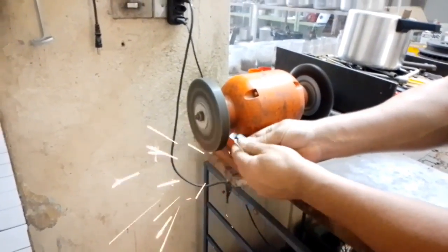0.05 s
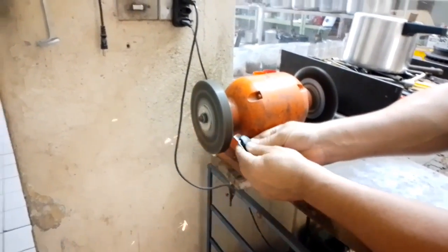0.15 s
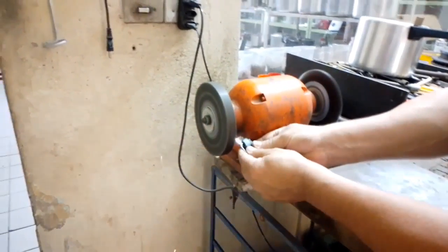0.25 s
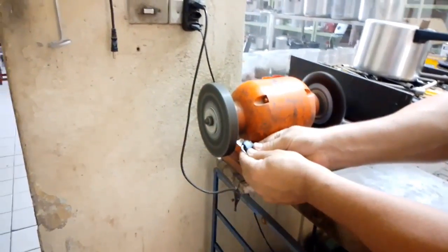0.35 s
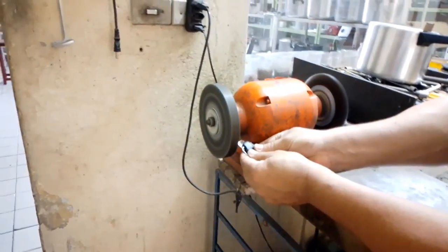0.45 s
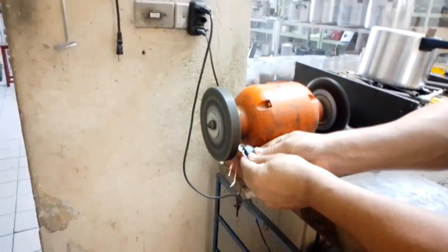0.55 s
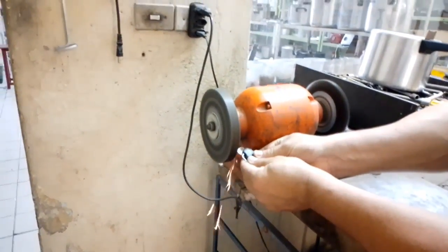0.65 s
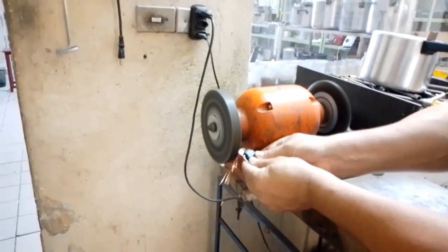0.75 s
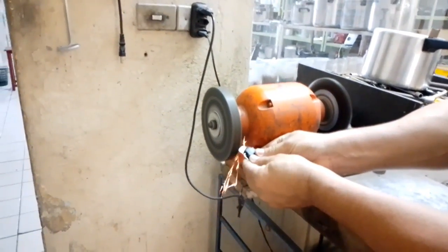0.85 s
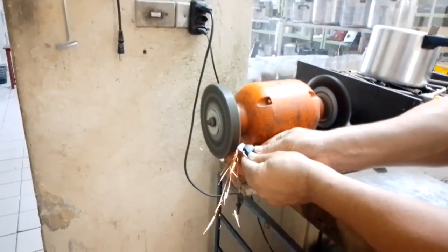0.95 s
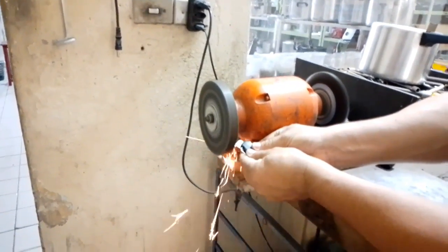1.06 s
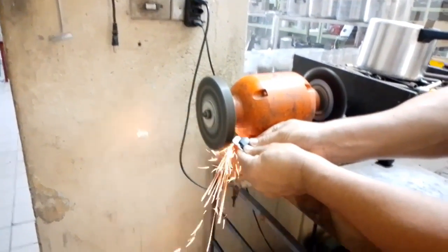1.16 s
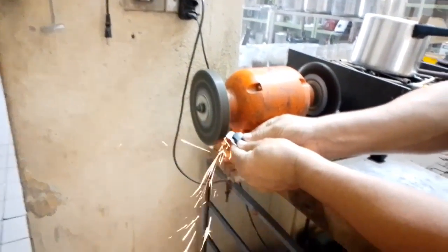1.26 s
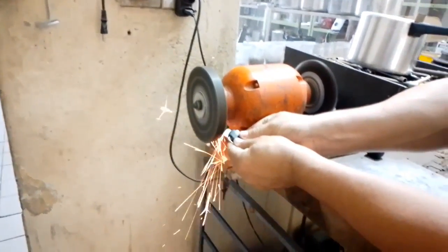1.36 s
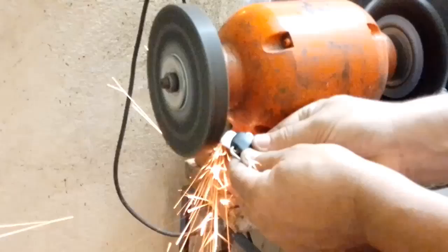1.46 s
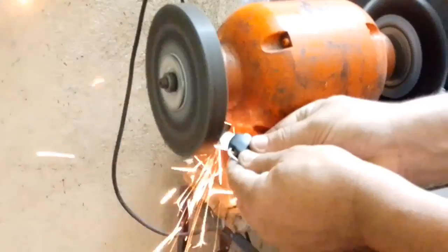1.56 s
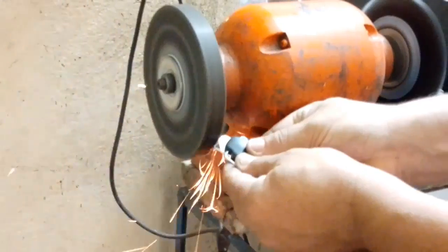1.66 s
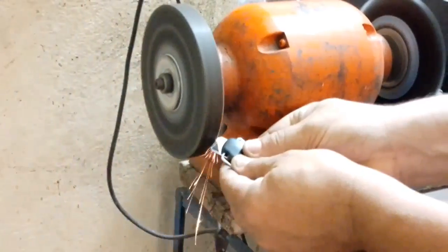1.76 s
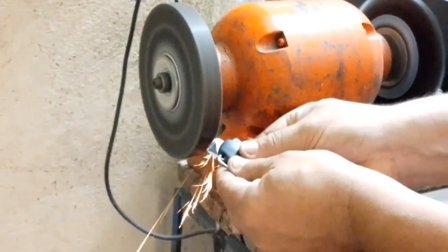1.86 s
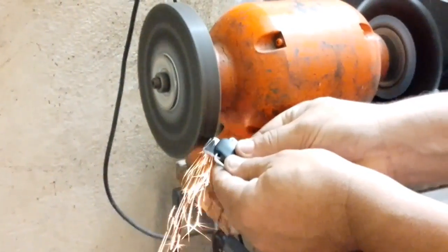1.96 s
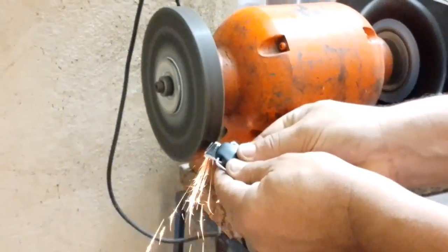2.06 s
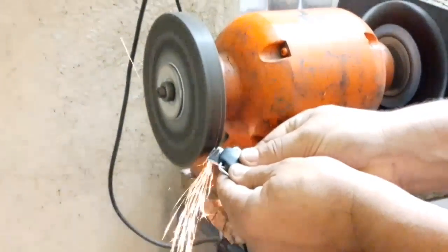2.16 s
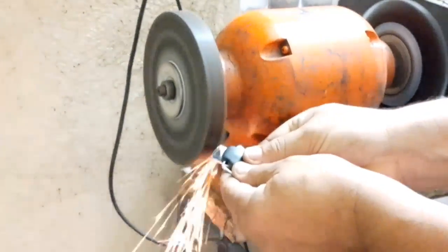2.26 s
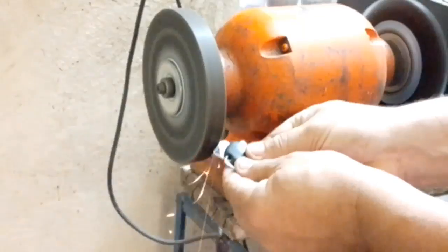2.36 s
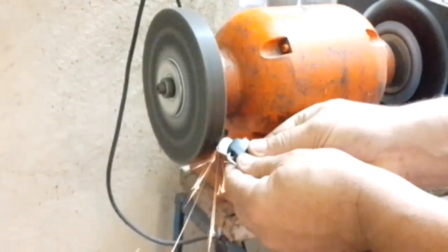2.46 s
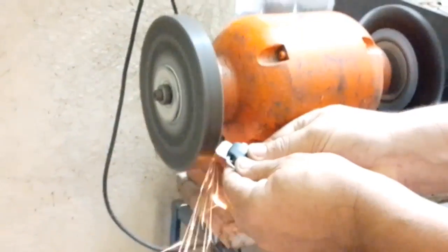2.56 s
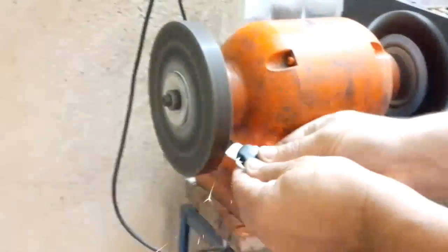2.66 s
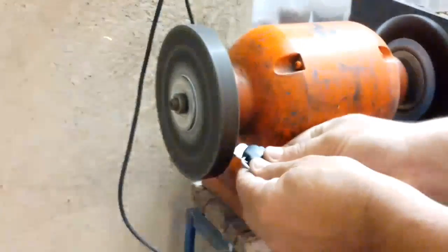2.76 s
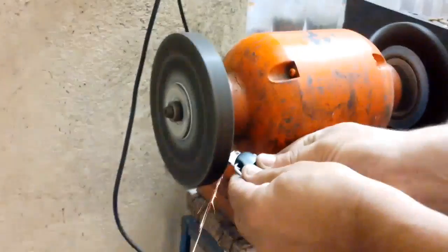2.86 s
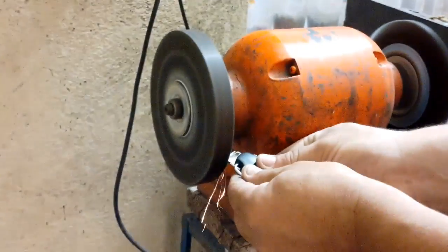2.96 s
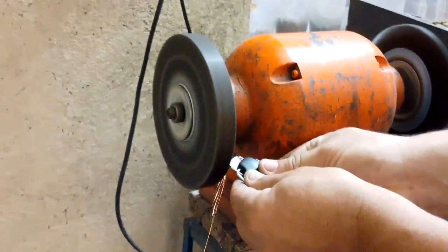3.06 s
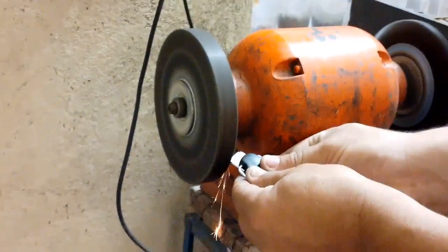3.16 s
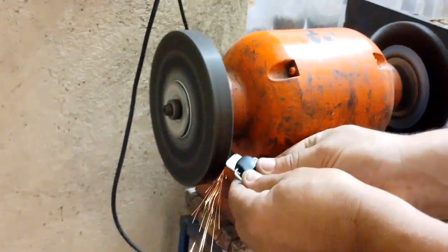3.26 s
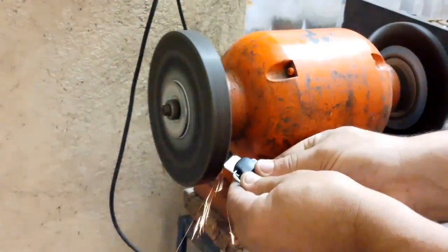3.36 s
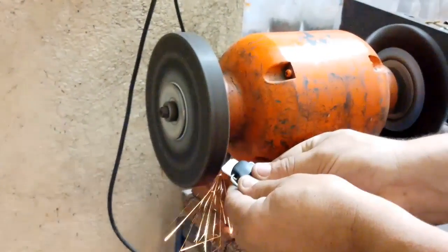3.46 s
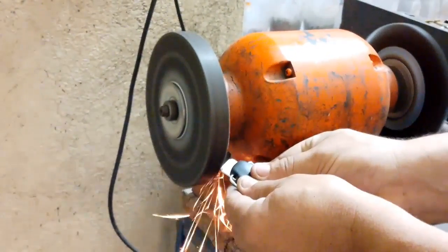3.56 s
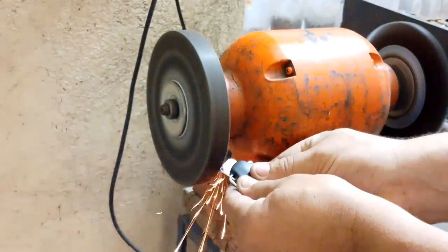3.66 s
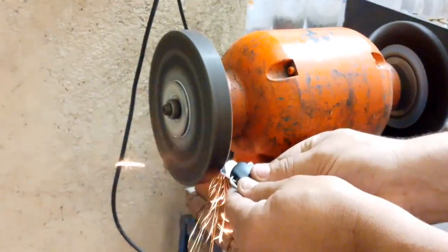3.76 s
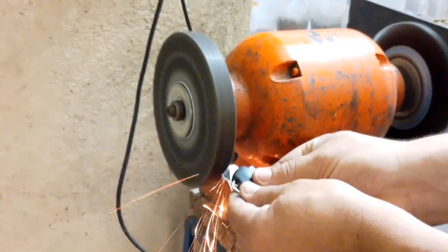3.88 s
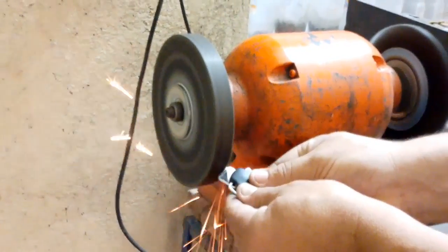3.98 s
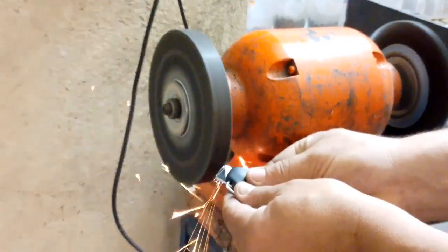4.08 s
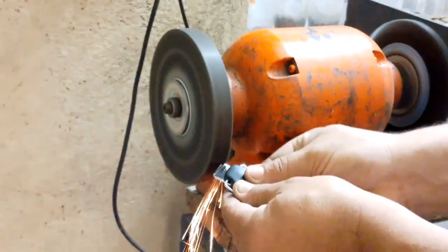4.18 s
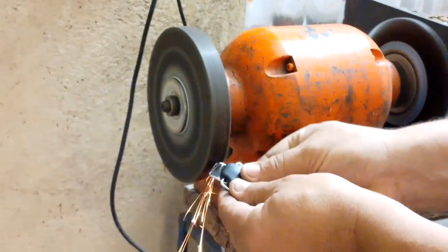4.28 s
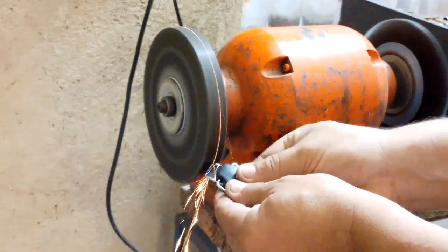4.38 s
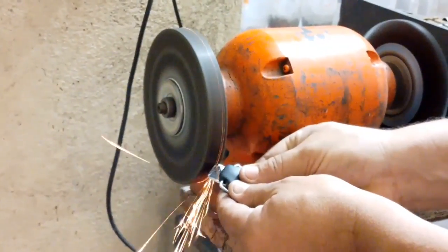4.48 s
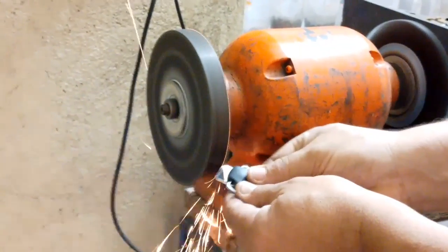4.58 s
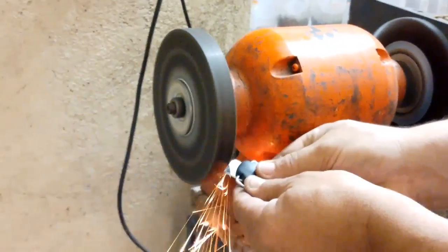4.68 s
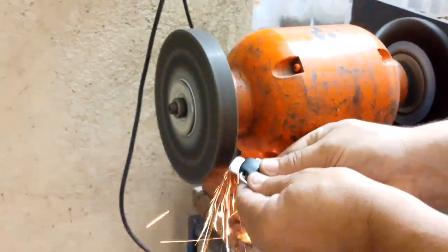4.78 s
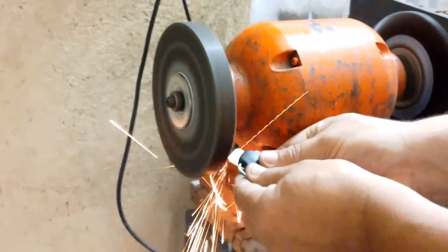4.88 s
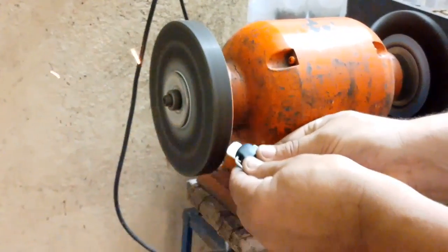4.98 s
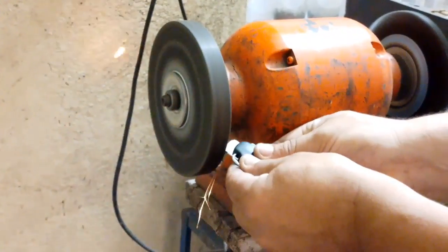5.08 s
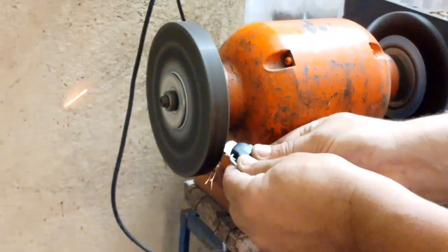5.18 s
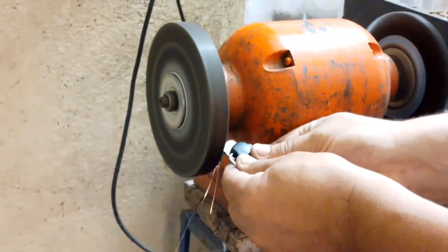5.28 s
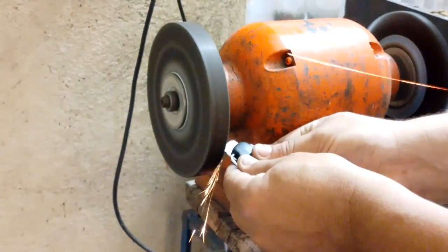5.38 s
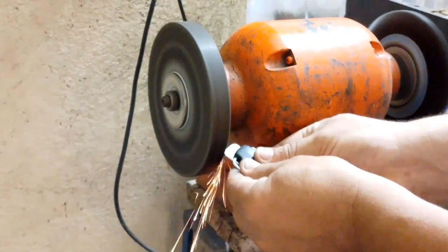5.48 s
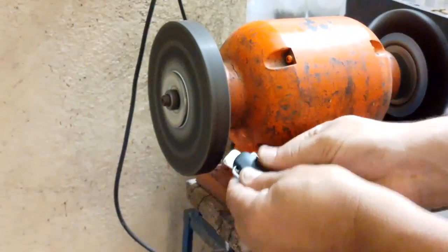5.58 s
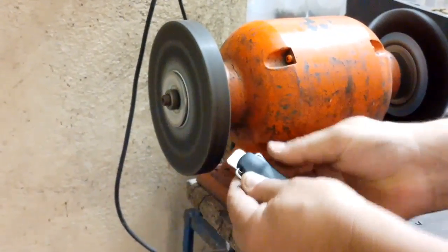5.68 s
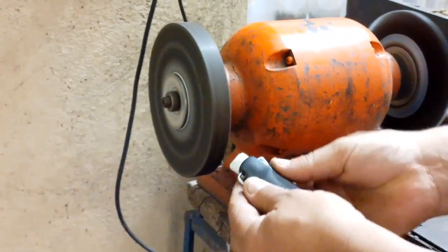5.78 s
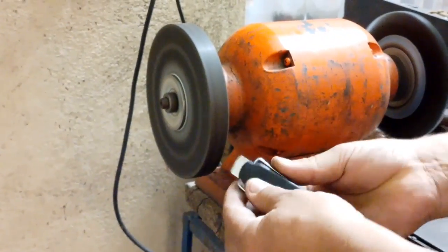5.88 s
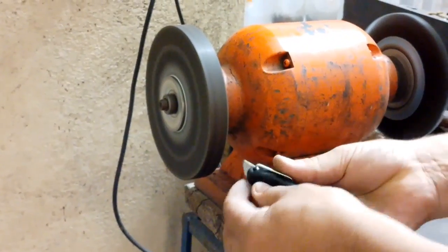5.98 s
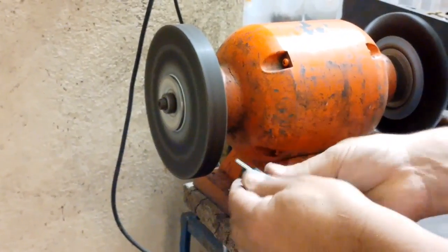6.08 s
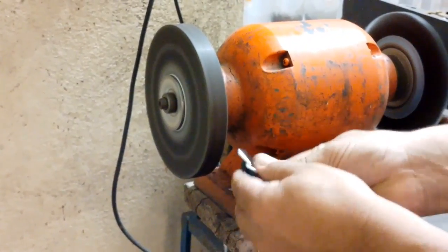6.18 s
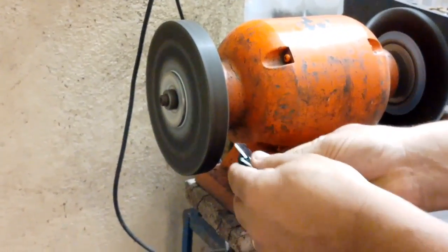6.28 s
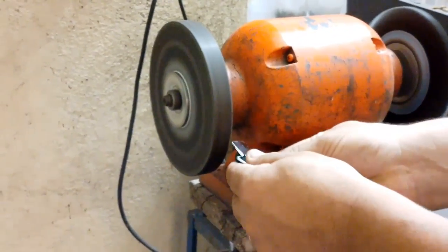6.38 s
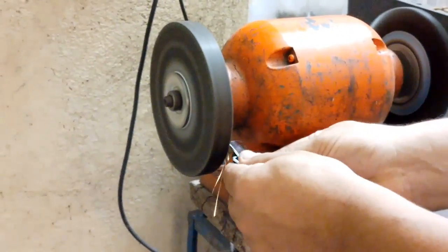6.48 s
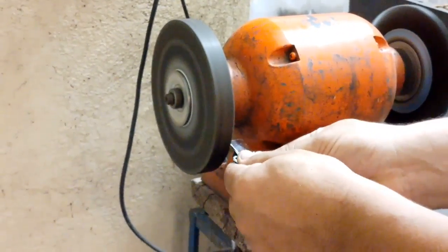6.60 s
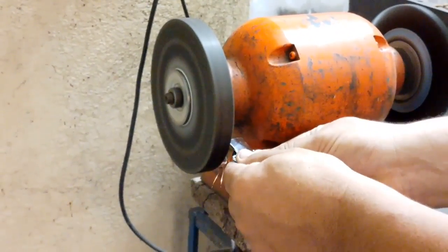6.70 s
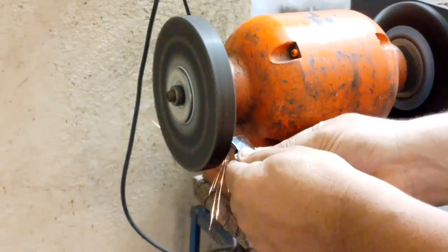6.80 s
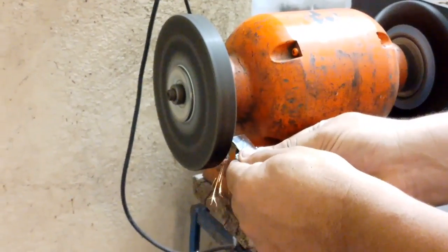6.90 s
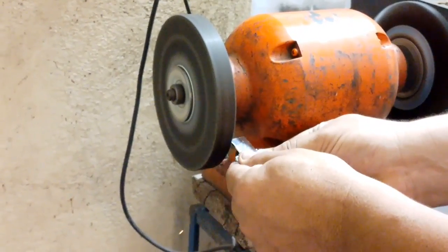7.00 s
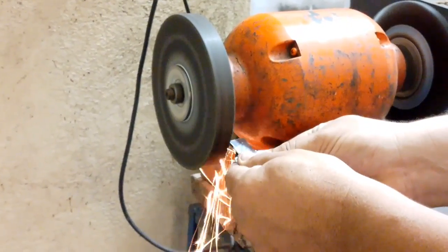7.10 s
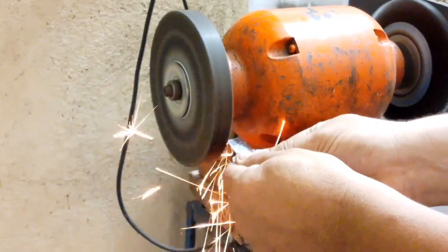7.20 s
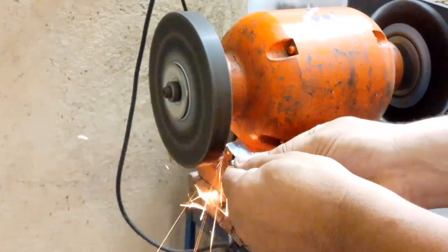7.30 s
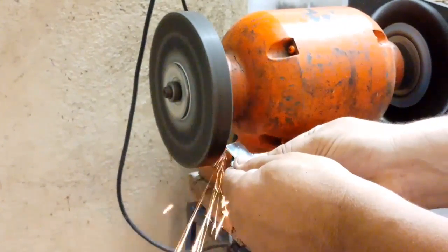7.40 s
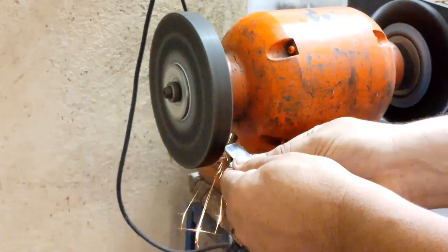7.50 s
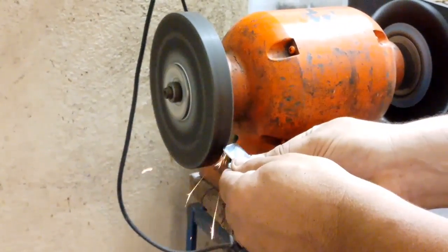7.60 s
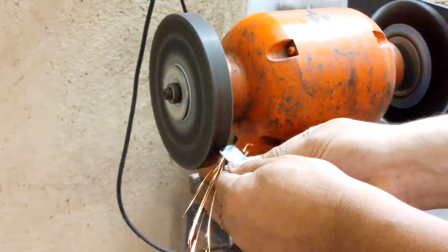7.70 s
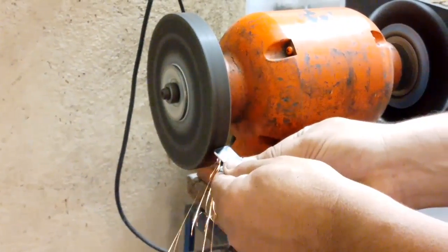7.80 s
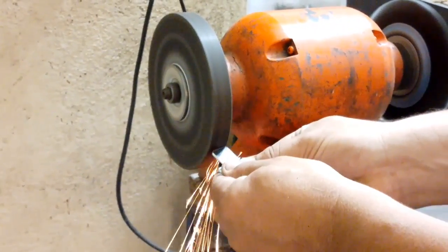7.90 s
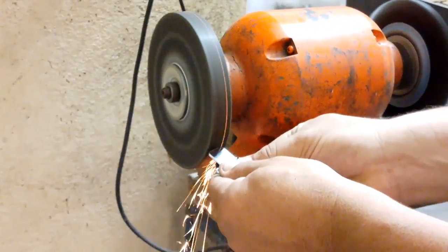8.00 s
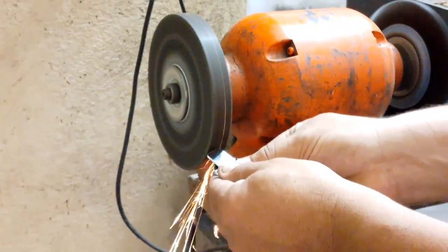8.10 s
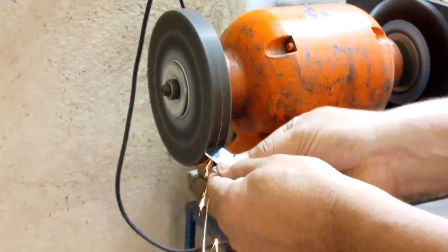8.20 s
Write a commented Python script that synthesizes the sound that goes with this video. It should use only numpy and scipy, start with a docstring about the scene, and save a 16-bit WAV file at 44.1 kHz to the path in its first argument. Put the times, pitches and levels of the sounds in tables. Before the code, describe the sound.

A bench grinder drones steadily while steel pressed on its wheel gives harsh, pulsing scraping hiss, metallic ringing and piercing squeals in repeated passes.

```python
"""Steel pressed by hand on the wheel of a running bench grinder, close to a two-port camera microphone.
Repeating and fresh grit scrapes the piece, the high spot biting once a turn, and the piece rings.
Friction makes the wheel sing on four modes and a broad low one; the stand adds a dull rasp.
The motor drones, the wheel's draught hisses and whistles in the ports, and walls echo the cut.
The camera turns loud passages down and softly clips the peaks."""
import sys
import numpy as np
from scipy import signal
from scipy.fft import rfft, irfft, next_fast_len
from scipy.io import wavfile
from scipy.ndimage import uniform_filter1d, map_coordinates

SR = 44100
rng = np.random.default_rng(int(sys.argv[2]) if len(sys.argv) > 2 else 0)


def log_audio(samples):
    """Write samples as a 16-bit WAV file to the path given in sys.argv[1]."""
    # one column per channel
    frames = np.atleast_2d(samples).T
    # limit to full scale, then quantise
    limited = np.clip(frames, -1, 1)
    pcm = np.round(limited * 32767).astype(np.int16)
    wavfile.write(sys.argv[1], SR, pcm)


N = 363825
TURN_HZ = 59.15  # wheel turns a second

# contact on the rim: [t/s, lag of the high spot/turns, bite setting/dB before the turn shape,
# share of grit that repeats each turn/0-1]
RIM_CONTACT = [(0.5, -0.08, 11, 0.24), (0.75, 0.05, 19, 0.39), (1.17, 0.15, 16.5, 1), (1.25, 0.14, 10.5, 1),
               (1.86, 0.24, 8, 0.55), (1.95, -0.24, 12.5, 0.17), (2.22, -0.12, 20, 0.16),
               (2.3, 0.089, 12, 0.9), (2.8, 0.12, 11, 0.4), (3.05, 0.18, 13.5, 0.38),
               (4.05, 0.094, 19.5, 0.72), (4.13, -0.13, 10, 0), (4.55, -0.12, 18.5, 0.13),
               (4.6, 0.079, 20, 0.62), (5.5, 0.16, 14.5, 0.33), (6.4, 0.24, 10, 0.3),
               (7.1, -0.095, 10, 0.3), (7.36, -0.28, 10, 0.25), (7.52, -0.3, 8.5, 0.3),
               (7.8, -0.32, 10.5, 0.27), (7.86, -0.71, 12, 0)]
# how the piece is turned to the wheel: [t/s, position/0 on edge to 1 flat]
PIECE_TURNED = [(1.1, 0.13), (1.3, 0.71), (2.62, 0.83), (2.8, 0.044), (3.3, 0.052), (3.55, 0.79),
                (3.95, .8), (4.2, 0.74), (5.0, 0.075), (6.7, 0.021), (7.2, 0.48), (8.2, 0.56)]


def amp(db):
    """Amplitude factor for a level in dB."""
    return 10 ** (np.asarray(db) / 20)


def unit(x):
    """x scaled to an RMS of one along its last axis."""
    return x / np.sqrt(np.mean(x ** 2, axis=-1, keepdims=True) + 1e-20)


def curves(rows):
    """One value per sample for each column after the time."""
    s, *cols = np.transpose(rows)
    return [np.interp(np.arange(N) / SR, s, c) for c in cols]


def shape(points):
    """Gain against frequency from rows [f/Hz, level/dB, ..], one row of gains for each level column."""
    f, *cols = np.transpose(points)
    return lambda hz: amp([np.interp(np.log(hz + 1), np.log(f + 1), c) for c in cols])


def wobble(rate):
    """A smooth random curve, rate knots a second."""
    knots = rng.standard_normal(int(N * rate / SR) + 4)
    return map_coordinates(knots, [np.arange(N) * rate / SR])


def filtered(x, response):
    """x times a response of frequency."""
    m = next_fast_len(N + 8192)
    return irfft(rfft(x, m) * response(np.fft.rfftfreq(m, 1 / SR)), m)[..., :N]


def resonance(modes):
    """Causal response of damped modes [f/Hz, width/Hz, level/dB], summed with alternating sign."""
    def response(f):
        total = 0
        for k, (centre, width, db) in enumerate(modes):
            damping = 1j * f * width
            total = total + (-1) ** k * amp(db) * damping / (centre * centre - f * f + damping)
        return total
    return response


def narrow(hz, width):
    """Noise passed twice through one mode, new at each port; width/Hz is that of a single passage."""
    mode = resonance([(hz, width, 0)])
    return unit(filtered(rng.standard_normal((2, N)), lambda f: mode(f) ** 2))


def motor():
    """Shaft orders and a drumming stand over a rumble that throbs with the turn, alike at both ports."""
    # shaft hum: [order/multiple of the turn, level/dB]
    shaft = [(2, -47.5), (4, -46.5), (5, -41.5), (6, -40.5), (7, -45.5)]
    # the stand drums: [f/Hz, width/Hz of a single passage, level/dB]
    stand = [(381, 17, -52), (557.3, 33, -39), (743, 28, -46)]
    # colour of the motor and stand rumble: [f/Hz, relative level/dB]
    drone = [(30, -20.5), (160, -23), (217, -3.5), (345, 0.5), (450, -2), (580, -4), (1100, -9.5),
             (1300, -30), (1700, -48)]
    angle = 2 * np.pi * TURN_HZ * np.arange(N) / SR
    hum = np.zeros(N)
    for order, db in shaft:
        unsteady = amp(db + min(.9 * order, 3) * wobble(9))
        hum += np.sqrt(2) * unsteady * np.sin(order * angle + rng.uniform(0, 5.9))
    for hz, width, db in stand:
        hum += amp(db) * narrow(hz, width)[0]
    throb = amp(1.4 * np.sin(angle) + 1.75 * wobble(12))
    mid, side = unit(filtered(rng.standard_normal((2, N)) * throb, shape(drone)))
    # the ports differ more as the wavelength shrinks
    side = filtered(side, lambda hz: hz / np.hypot(hz, 1050))
    return hum + amp(-30.5) * np.array([mid + side, mid - side])


def draught():
    """Air thrown off the wheel hisses in each port around that port's own resonances."""
    # hiss and whistle in the ports: [f/Hz, relative left level/dB, relative right level/dB]
    whistle = [(1200, -34, -32.5), (6400, -35.5, -36), (6840, -22, -44), (7680, -9.5, -40),
               (8430, -28, -29), (9300, -27, -18), (10450, -44, -15.5), (10560, -35, 0),
               (11040, -41, -10.5), (12810, -44, -24.5), (12890, -40, -1.5), (12870, -43, -50)]
    air = rng.standard_normal((2, N)) * amp(wobble(28))
    hiss = filtered(air, lambda hz: shape(whistle)(hz) * (hz > 300))
    return amp(-22.0) * hiss / np.sqrt(np.mean(hiss[1] ** 2))


def passes():
    """The hand's pressure: scrape level, right-port extra, ringing, singing and settling loss, all in dB."""
    # how hard the piece presses, one curve for each pass at the wheel: [t/s, scrape level/dB]
    pressure = [
        [(0.0, -3.5), (0.03, -19)],
        [(0.525, -18), (0.66, -10.5), (1.08, -11), (1.37, -2), (1.44, -4), (1.83, -0.5), (1.86, -32),
         (1.96, -14.5)],
        [(2.025, -19), (2.18, -17), (2.27, -10), (2.37, -2), (2.61, -3), (2.64, -34), (2.74, -30.5)],
        [(2.805, -9.5), (2.98, -16.5), (3.5, -13), (3.57, -8.5), (3.97, -9.5), (4.05, -19), (4.23, -18),
         (4.46, -19), (4.55, -12), (4.575, -36)],
        [(4.617, -14), (4.75, -11), (4.89, -14), (4.99, -25.5), (5.21, -15.5), (5.29, -20.5), (5.5, -10.5),
         (5.515, -38.5), (5.6, -28.5)],
        [(6.44, -27), (6.48, -24), (6.58, -30), (6.71, -16.5), (6.84, -22), (6.91, -21), (6.96, -22.5),
         (7.01, -17.5), (7.05, -19.5), (7.17, -14.5), (7.21, -18), (7.32, -13), (7.45, -17)],
        [(7.515, -29), (7.6, -24), (7.65, -17), (7.79, -29), (8.07, -23), (8.14, -20.5), (8.25, -28.5)],
    ]
    # how the piece is held in each pass, turning evenly from start to end:
    # [right-port extra at start/dB, at end/dB, ringing over the scrape at start/dB, at end/dB, singing/dB]
    hold = [(5, 0.1, -5, -6, -2.5), (2, 4, -3.5, -2.5, 1), (4.5, 0.19, 1.5, -4, 0.4), (2, 4.4, -2, -0.4, 0),
            (3.5, 3.1, -1, -4, -2.5), (7.5, 1.2, -8, -5, 1), (7.5, 5.2, -9.5, 1.5, -12.5)]
    touch_s, lift_db_per_s = .01, 151  # lands over 40 dB in touch_s, leaves with a fade
    settle_peak_db, settle_s = 10.5, 0.03
    t = np.arange(N) / SR
    levels = []
    for rows in pressure:
        landing = 40 * np.maximum(rows[0][0] - t, 0) / touch_s
        leaving = lift_db_per_s * np.maximum(t - rows[-1][0], 0)
        levels.append(curves(rows)[0] - (landing + leaving))
    levels = np.array(levels)
    now = levels.argmax(axis=0)  # the loudest pass
    start, end = np.array([(rows[0][0], rows[-1][0]) for rows in pressure])[now].T
    along = np.clip((t - start) / (end - start), 0, 1)
    # a pass begins thin and high, save one already under way at the start; the ringing fills in
    settle_db = settle_peak_db * np.exp(-np.maximum(t - start, 0) / settle_s) * (start > 0)
    right0, right1, ring0, ring1, sing_db = np.array(hold)[now].T
    right_db = right0 + along * (right1 - right0)
    ring_db = ring0 + along * (ring1 - ring0)
    return np.maximum(levels.max(axis=0), -70), right_db, ring_db, sing_db, settle_db


def rim(turns, memory, size=3000):
    """The grit profile read at the wheel's angle; it wears, keeping a share memory from turn to turn."""
    count = int(turns.max()) + 2
    bins = size // 8 - 1
    fresh = rng.standard_normal((count, bins)) + 1j * rng.standard_normal((count, bins))
    worn = signal.lfilter([1], [1, -np.clip(memory, 0, .99)], fresh, axis=0)
    tracks = irfft(worn, size).ravel()
    return unit(np.interp(turns * size, np.arange(tracks.size), tracks))


def patchy(x, depth_db):
    """The colour drifts as the hands shift the piece: a moving bright band and slow random patches of gain."""
    edge_hz, flat_hz = 6420, 7510  # the brightest band in each position
    bright_db, bright_width_hz = 6, 310
    hz, t, z = signal.stft(x, SR, nperseg=256)
    field = uniform_filter1d(rng.standard_normal(z.shape), size=2, axis=1)
    field = uniform_filter1d(field, size=40, axis=2)
    centre = edge_hz + (flat_hz - edge_hz) * np.interp(t, *np.transpose(PIECE_TURNED))
    band = np.exp(-((hz[:, None] - centre) / bright_width_hz) ** 2 / 2)
    gain = amp(depth_db * field / field.std() + bright_db * band)
    return signal.istft(z * gain, nperseg=256)[1][:, :N]


def ringing(force):
    """The force rings the steel's modes, cross-faded between its two positions."""
    # modes of the piece, each response then squared:
    # [f/Hz, width/Hz before squaring, on-edge level/dB before squaring, flat level/dB before squaring]
    steel = [(2595, 62, -6, -5), (2910, 71, -46, -4.5), (3176, 116, -5, -25), (3818, 308, -0.5, -0.5),
             (5170, 226, -3, -3.5), (5386, 166, -1.5, -2), (6156, 237, 0, -25), (6990, 110, -4.5, -8)]
    flat = np.clip(curves(PIECE_TURNED)[0], 0, 1)
    edge_modes = resonance([(hz, width, edge_db) for hz, width, edge_db, _ in steel])
    flat_modes = resonance([(hz, width, flat_db) for hz, width, _, flat_db in steel])
    on_edge = filtered(force * np.sqrt(1 - flat), lambda hz: edge_modes(hz) ** 2)
    held_flat = filtered(force * np.sqrt(flat), lambda hz: flat_modes(hz) ** 2)
    return on_edge + held_flat


def grinding():
    """Grit scrapes the steel: repeating and fresh grains under a bite that peaks once a turn."""
    # the edge catches the high spot: [t/s, nominal level/dB before its click and rise]
    snags = [(0.5273, -15), (2.0266, -7), (2.7932, -13), (2.806, -11.5), (4.242, -21), (4.259, -13),
             (4.326, -17), (4.617, -7), (4.633, -6.5), (5.174, -15), (5.2082, -21), (5.2756, -11),
             (7.165, -12.5), (7.266, -21.5), (7.316, -11), (7.4687, -11.5), (7.522, -8.5), (7.5344, -8.5),
             (7.569, -10.5), (7.619, -4.5), (7.772, -13.5), (7.788, -10), (7.9037, -18), (8.226, -19),
             (8.242, -18)]
    # colour of the scraping at the two ports: [f/Hz, relative left level/dB, relative right level/dB]
    scrape = [(3040, -29, -35), (4640, -6, -9), (5650, -5.5, -61), (6300, -1.5, -21), (7580, 5.5, -12),
              (10530, -9.5, -0.5), (9800, 8, -0.5), (11190, -8.5, 5), (12240, -43, -10), (14530, -4, -17)]
    light_right, firm_db = 0.15, -1  # right-port dB gained per dB of pressure under a firm touch
    tick_db, tick_s = -14.5, 0.00052  # base level of the high spot's tick; half-width of its pulse
    wear = .95  # share of the grit profile kept from turn to turn
    level_db, right_db, ring_db, _, settle_db = passes()
    right_db = right_db + light_right * np.minimum(firm_db - level_db, 18)
    lag, bite_db, repeat = curves(RIM_CONTACT)

    turns = TURN_HZ * np.arange(N) / SR - lag + 1
    since = (turns + 0.18) % 1
    bump = np.minimum(since / 0.25, 1) * np.exp(-since / 1.1)  # quick bite, slower release
    strength = 1 + 0.14 * np.tanh(wobble(45))  # the piece chatters, so some turns bite harder
    bite = amp(2 * bite_db * bump * strength + 2.2 * wobble(17) + 0.97 * wobble(700))
    bite /= np.sqrt(np.abs(uniform_filter1d(bite ** 2, size=4474)))  # keeps the running power even

    repeat = np.clip(repeat, 0, 1)
    grit = []
    for port in "LR":
        repeating = np.sqrt(repeat) * rim(turns, memory=wear)
        grit.append(repeating + np.sqrt(1 - repeat) * rng.standard_normal(N))
    grit = np.array(grit)

    touching = np.clip((level_db + 37) / 5, 0, 1)  # the faintest levels mean the piece is off the wheel
    nearest = np.round(turns)
    sizes_db = 1.6 * rng.standard_normal(int(turns.max()) + 2)[nearest.astype(int)]
    pulse = np.exp(-((turns - nearest - .05) / (tick_s * TURN_HZ)) ** 2)
    tick = amp(tick_db + 0.89 * bite_db + sizes_db) * pulse
    force = amp(level_db) * (bite + tick) * touching

    t = np.arange(SR // 50) / SR
    click = (1 + 1.05 * np.exp(-t / 0.00076)) * np.minimum(t / 0.00056, 1)
    for s, db in snags:
        start = round(s * SR)
        force[start:][:len(t)] += (amp(db - 60 * t / 0.029) * click)[:N - start]

    colour = shape(scrape)
    scale = 1 / np.sqrt(np.mean(filtered(grit, colour)[0] ** 2))
    hiss = patchy(grit * force * amp([-settle_db, right_db]), depth_db=3.0)
    hiss = filtered(hiss, lambda hz: colour(hz) * (hz > 2300))
    shared = unit(grit + 0.23 * grit[::-1])  # the ports partly share what drives the ringing
    rung = ringing(patchy(shared * force * amp(ring_db - settle_db), depth_db=6))
    return scale * (hiss + rung)


def workshop(x):
    """Walls return a short, diffuse tail, different at each port."""
    t = np.arange(SR // 2) / SR
    tail = rng.standard_normal((2, len(t))) * amp(-60 * t / 0.46) * (t > .004)  # falls 60 dB in 0.46 s
    return signal.fftconvolve(x, tail / np.linalg.norm(tail[0]), axes=1)[:, :N]


def sung():
    """Mode levels in dB, broad mode last: all follow pressure and swell in squeals.

    In skating the four tones drop and the broad mode rises a little."""
    # base level of each wheel mode, before hold and squeals: [level/dB]
    sings_db = [-18, -15, -20.5, -22]
    # squeals, one list for each wheel mode, the broad one last: [peak t/s, extra level/dB, build-up/s]
    squeal_rows = [
        [(1.22, 7, .05), (1.9, 9.5, 0.31), (2.6, 12.5, 0.1), (2.97, 8.5, 0.071), (3.98, 15.5, 0.26),
         (4.77, 12.5, 0.1)],
        [(0.02, 33, 0.14), (1.36, 12.5, 0.16), (1.78, 10.5, 0.25), (5.46, 7.5, 0.048), (6.5, 3.5, 0.09),
         (6.76, 7.5, 0.14), (6.93, 8.5, 0.036), (7.02, 6.5, 0.033), (7.17, 5, 0.045), (7.33, 9, 0.04)],
        [(1.05, 6.5, 0.15), (1.75, 7.5, 0.087), (7.3, 16.5, 0.038)],
        [(0.03, 30.5, 0.059), (0.65, 4, 0.099), (2.5, 4.5, 0.089), (6.74, 7, 0.13), (7.3, 13.5, 0.058)],
        [(0.68, 5.5, 0.12), (6.75, -0.5, 0.23), (8.19, 12, 0.068)],
    ]
    squeal_fall_s = 0.056
    sing_grows, sing_lag_s = 0.54, 0.019  # dB per dB of pressure; time to build up and die
    # under this repeating share the piece skates and hardly drives the four tones; the broad mode gains
    skating, skate_loss_db, broad_loss_db = 0.28, 40, -3.5
    t = np.arange(N) / SR
    level_db, _, _, sing_db, _ = passes()
    skate = np.clip((skating - curves(RIM_CONTACT)[2]) / 0.11, 0, 1)
    loss_db = np.outer([skate_loss_db, broad_loss_db], skate)
    drive = amp(sing_grows * level_db + sing_db - loss_db) * (level_db > -36)
    keep = np.exp(-1 / (sing_lag_s * SR))
    lagged = signal.lfilter([1 - keep], [1, -keep], drive, zi=keep * drive[:, :1])[0]
    drive_db, broad_db = 20 * np.log10(lagged + 1e-4)

    def swell(s, db, rise):
        return db * np.exp(-((t - s) / np.where(t < s, rise, squeal_fall_s)) ** 2)

    squeals = [sum(swell(*row) for row in rows) for rows in squeal_rows]
    modes = [drive_db + db + squeal for db, squeal in zip(sings_db, squeals)]
    return modes + [broad_db + squeals[-1]]


def singing():
    """Friction keeps the wheel's modes going: unsteady tones in a rough skirt, and a broad low mode."""
    # wheel modes: [f/Hz, sag at full pressure/Hz, left minus right level/dB, roughness/rad]
    wheel_modes = [(9512, 16, -7, .5), (9853, 6, -9, .5), (4617, 25, 1, .8), (4384, 27, 3, .9)]
    t = np.arange(N) / SR
    out = np.zeros((2, N))
    levels = sung()
    load = uniform_filter1d(amp(passes()[0]), size=4410)
    for (hz, sag_hz, pan_db, rough), level_db in zip(wheel_modes, levels):
        phase = 2 * np.pi * np.cumsum(hz - sag_hz * load + 3 * wobble(6)) / SR
        phase = phase + rough * wobble(25)
        phase = phase + 0.048 * np.sin(2 * np.pi * TURN_HZ * t)  # nudged once a turn
        tone = np.sqrt(2) * amp(2.0 * wobble(20)) * np.sin(phase + [[0], [1.1]])
        skirt = 1.09 * rough * narrow(hz, width=110)
        out += amp(level_db + [[pan_db / 2], [-pan_db / 2]]) * (tone + skirt)
    broad = narrow(2433, width=223)
    broad = unit(broad + 0.09 * broad[::-1])
    return out + amp(-27.5 + 2.6 * wobble(14)) * amp(levels[-1]) * broad


def rasp():
    """The cut shakes the stand: a dull unpitched rasp, fuller with the piece flat, that outlasts the touch."""
    body_db, body_grows, body_lag_s = -28, 1, 0.09  # base level; dB per dB of pressure; lag
    low_hz, high_hz = 1060, 2370
    level_db = passes()[0]
    keep = np.exp(-1 / (body_lag_s * SR))
    drive = signal.lfilter([1 - keep], [1, -keep], amp(body_grows * level_db) * (level_db > -36))

    def band(hz):
        return 1 / np.sqrt((1 + (low_hz / (hz + 1)) ** 8) * (1 + (hz / high_hz) ** 8))

    noise = unit(filtered(rng.standard_normal((2, N)), band))
    return amp(body_db + 3.05 * curves(PIECE_TURNED)[0] + 3.2 * wobble(20)) * drive * noise


def scene():
    """Everything at the grinder, the cut echoed by the room."""
    cut = grinding()
    return cut + amp(-7.0) * workshop(cut) + rasp() + singing() + motor() + draught()


def record(dry):
    """Gain control on the power of both ports, soft clipping, a bass cut and a sharp treble limit."""
    top_hz = 14300
    power = np.abs(uniform_filter1d((dry ** 2).sum(axis=0), size=1800, mode="nearest"))
    power_db = 10 * np.log10(power + 1e-12)
    over_db = 2 * np.logaddexp(0, (power_db + 12.0) / 2)  # soft knee at -12 dB
    level = amp(-3) * dry * amp(-.47 * over_db)
    level = level / (1 + np.abs(level / .8) ** 12) ** (1 / 12)  # peaks bend towards 0.8
    return filtered(level, lambda hz: (hz < top_hz) * hz / np.hypot(hz, 70))


dry = scene()
out = record(dry)
log_audio(out)
```